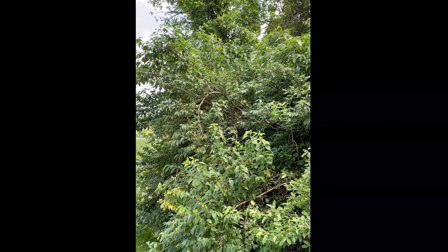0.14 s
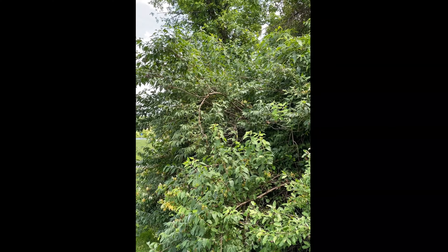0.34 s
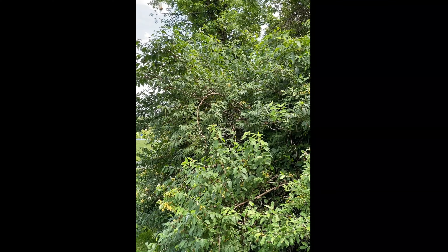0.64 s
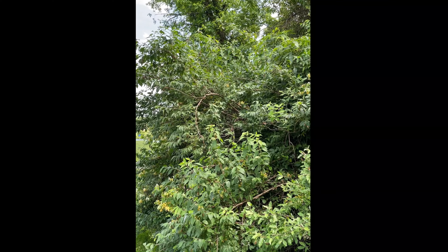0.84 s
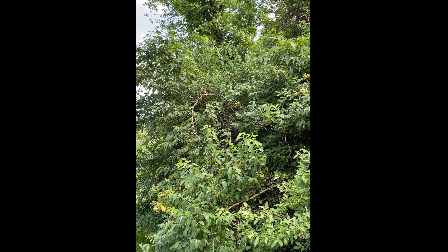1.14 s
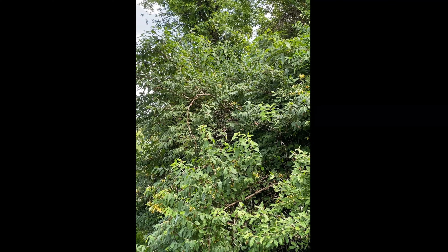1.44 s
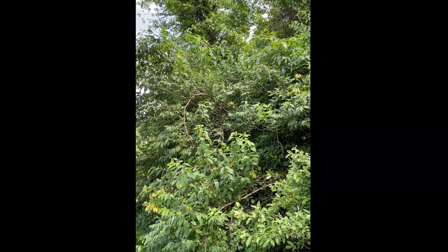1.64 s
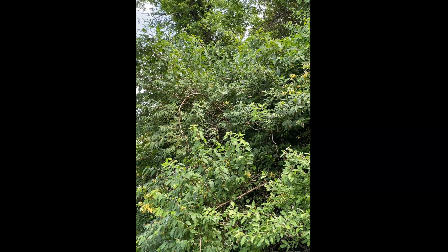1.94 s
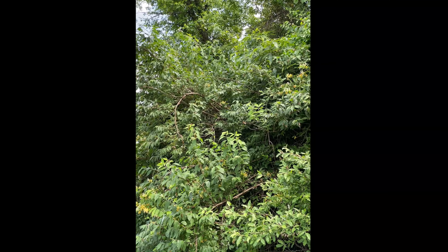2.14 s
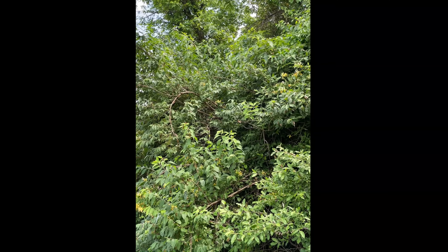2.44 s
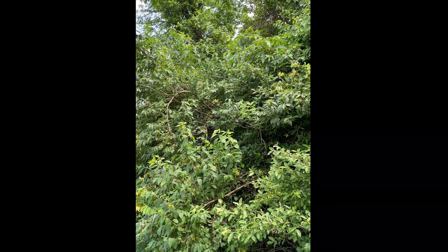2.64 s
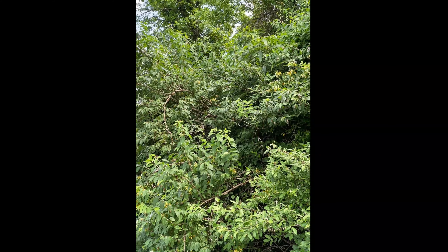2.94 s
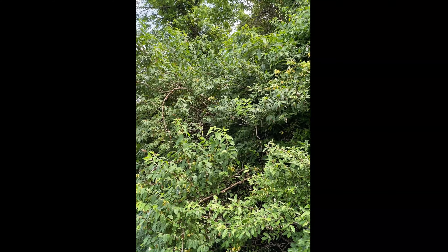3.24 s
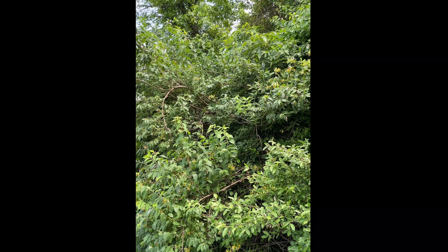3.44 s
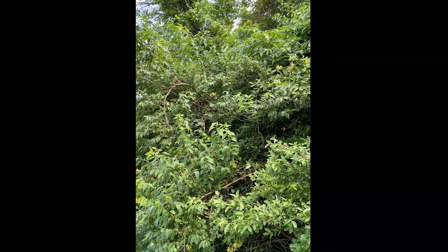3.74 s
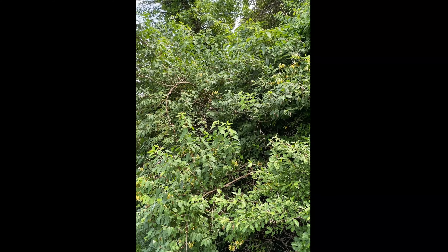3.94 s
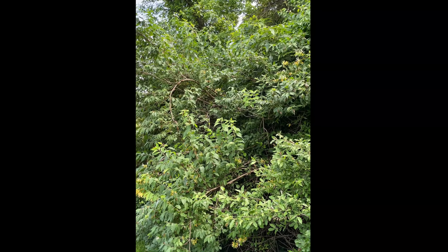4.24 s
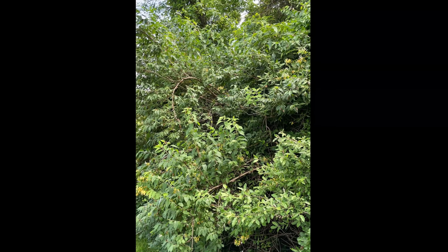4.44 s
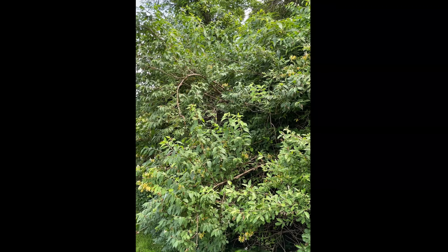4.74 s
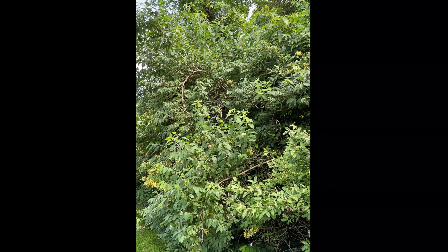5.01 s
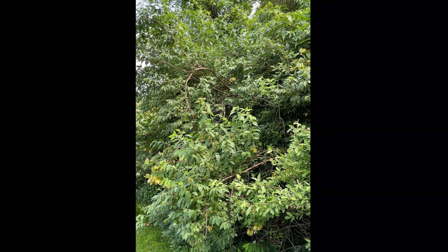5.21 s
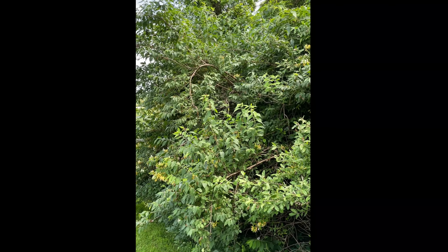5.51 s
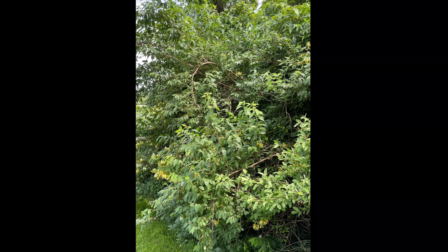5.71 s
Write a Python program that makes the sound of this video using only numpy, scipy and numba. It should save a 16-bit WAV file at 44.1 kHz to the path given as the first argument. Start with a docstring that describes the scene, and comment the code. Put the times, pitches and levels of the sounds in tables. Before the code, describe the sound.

Massed cicadas shimmer in a high, harsh buzz that rises and sinks, with a mellow steady drone of other cicadas farther off.

```python
"""Periodical cicadas that buzz near 5.7 kHz and swell in a shared wave, in the trees at the edge of a lawn,
on the two microphone ports of a hand-held phone. Bursts of noise and clicks ring each abdomen.
Farther off, a second kind holds hollow notes near 1.3 kHz, sine tones that slur down at their ends
and merge into a drone. Filtered noise gives the faint traffic rumble; wavering tones, a far engine's hum."""
import sys
import numpy as np
from scipy import signal
from scipy.fft import rfft, irfft, next_fast_len
from scipy.io import wavfile
from scipy.ndimage import map_coordinates
from numba import njit

SR = 44100
rng = np.random.default_rng(int(sys.argv[2]) if len(sys.argv) > 2 else 0)


def master(y):
    """Save y as 16-bit WAV."""
    cut = np.clip(np.atleast_2d(y).T, -1, 1)
    pcm = np.round(cut * 32767)  # scale
    wavfile.write(sys.argv[1], SR, pcm.astype(np.int16))


N = 258867
TIME = np.arange(N) / SR
SIZE = next_fast_len(N)
FREQS = np.arange(SIZE // 2 + 1) * SR / SIZE

# Shared wave of the buzzers, before each layer's own gain:
# (time [s], level of the ring [dB], level of the rasp [dB])
BUZZ_WAVE = [(0.0, -29.5, -38.5), (0.13, -28, -38.5), (0.33, -28, -40.5), (0.42, -30, -40.5),
             (0.85, -31.5, -43), (1.17, -31, -42.5), (1.43, -29.5, -41), (1.58, -31, -42.5),
             (2.12, -29.5, -42), (2.75, -28, -39.5), (3.3, -26.5, -38), (3.62, -27.5, -37),
             (4.02, -23, -35), (4.5, -22, -33.5), (4.82, -24.2, -35.5), (5.15, -24, -36),
             (5.45, -25.5, -37.5), (5.77, -28.6, -41), (5.87, -29.5, -39.5)]
# Pitch that the buzzers' abdomens ring around: (time [s], resonance [Hz])
ABDOMEN_PITCH = [(0.0, 5790), (1.15, 5650), (1.3, 5570), (1.88, 5626), (4.4, 5700), (5.87, 5730)]
# Rasp of the tymbal ribs around the abdomen's ring: (frequency [Hz], relative level [dB])
RASP_SPECTRUM = [(1800, -39), (2450, -25.5), (3100, -15), (3700, -2.4), (4200, 1.0), (4800, .3), (5200, 2),
                 (6900, -1.2), (7900, -3.2), (8700, -8), (9300, -18), (10400, -21), (11400, -15.3),
                 (12500, -16.8), (14000, -17.3), (15000, -22), (15700, -33)]
# Buzzers deep in the woods, dulled by distance: (frequency [Hz], relative level [dB])
FAR_BUZZ_SPECTRUM = [(1900, -31), (2350, -21), (2600, -15.5), (3100, -5.5), (3700, 2.5), (4300, 4.5),
                     (5500, -0.5), (8000, -48)]
# Blended voices of the farthest droners: (frequency [Hz], relative level [dB])
MURMUR_SPECTRUM = [(600, -42), (750, -22), (860, -12.5), (1030, -14), (1110, -6), (1190, 1), (1335, 3.5),
                   (1490, -5), (1580, -15), (1730, -21), (1860, -32.5), (2400, -41)]
# Nearer groups slurring down at the end of a note: (nominal time at the bottom [s],
# lowest pitch at the group's middle [Hz], relative level [dB], length of the slur [s])
SLUR_GROUPS = [(.75, 835, -67, 0.28), (1.48, 880, -63.5, .45), (1.88, 855, -60.5, .36),
               (3.449, 840, -63.5, .33), (4.5, 850, -59.5, 0.61), (5.4, 950, -64, 0.21),
               (5.699, 845, -63, 0.37)]
# Open air and traffic: (frequency [Hz], relative level [dB])
AIR_SPECTRUM = [(20, -15), (32, -21), (45, -6), (70, 0), (100, -5.5), (125, -8), (160, -11.5), (230, -17),
                (420, -17), (640, -19), (1800, -21), (4000, -29)]
# Hum of a far engine: (frequency [Hz], relative level [dB])
ENGINE_HUM = [(70, -11), (122, -10.5)]
# Course of the background, air and hum together: (time [s], relative level [dB])
RUMBLE_LEVEL = [(0, -60), (0.7, -59.5), (0.92, -58), (1.15, -59), (1.3, -56), (2.9, -55.5), (3.6, -54.5),
                (4.4, -56.5), (5.3, -59), (5.87, -57)]
# Short surges of the rumble: (time [s], level [dB])
RUMBLE_SURGES = [(1.3, -54), (5.08, -53), (5.6, -60)]
# The two microphone ports: (frequency [Hz], likeness [-1 to 1], lead of the left [rad])
MIC_PORTS = [(70, .998, 0), (140, .93, 0), (300, .25, 0), (620, -.28, 0), (1350, -.25, 0), (1800, .7, 0),
             (2600, .25, 0), (4200, .4, -.1), (4650, .25, -1.5), (5000, .52, -2), (5300, .3, -.6),
             (5700, .63, .45), (6500, .87, 1.15), (8500, .83, 2.4), (10000, .96, 3.14), (12500, .62, 4.7),
             (15000, .6, 6.4)]

# The drone makes one slow swell: it rises, holds and falls away
DRONE_DB, DRONE_CREST_S, DRONE_HOLD_S = -42.5, 2.75, 1.47
DRONE_RISE_DB_PER_S, DRONE_FALL_DB_PER_S = 1.58, 3
TOP_HZ = 15400  # upper limit of the phone


def undb(db):
    """Decibels to gain."""
    return 10 ** (np.asarray(db) / 20)


def unit(x):
    """Scale to rms 1."""
    return x / np.sqrt(np.mean(x ** 2))


def curves(table):
    """The columns of a timed table, sample by sample."""
    s, *columns = np.transpose(table)
    return [np.interp(TIME, s, column) for column in columns]


def spectra(table):
    """The columns of a frequency table, joined on a log axis."""
    hz, *columns = np.transpose(table)
    return [np.interp(np.log(FREQS + 1), np.log(hz), column) for column in columns]


def colour(x, table):
    """Filter by (frequency [Hz], level [dB]) points; rms 1."""
    gain = undb(spectra(table)[0])
    return unit(irfft(rfft(x, SIZE) * gain, SIZE)[..., :N])


def walk(rate, t=TIME):
    """Random values, `rate` of them a second, joined by straight lines."""
    points = rng.standard_normal(4096)
    return np.interp(t * rate + rng.random(), np.arange(len(points)), points)


@njit
def resonate(x, hz, width):
    """State-variable band-pass with a moving centre, like a resonant cavity whose pitch shifts."""
    y, band, low = np.empty(len(x)), 0., 0.
    for i in range(len(x)):
        g = np.tan(np.pi * hz[i] / SR)
        damping = width / hz[i]
        v = (band + g * (x[i] - low)) / (1 + g * (g + damping))
        band = 2 * v - band
        low = low + 2 * g * v
        y[i] = damping * v
    return y


def ports(pair):
    """Share two unrelated halves of the sound field between the left and right microphone ports."""
    likeness, lead = spectra(MIC_PORTS)
    likeness = np.clip(likeness, -1, 1)
    shares = np.sqrt([(1 + likeness) / 2, (1 - likeness) / 2])
    common, apart = rfft(pair, SIZE) * shares
    turn = np.exp(1j * lead / 2)
    left, right = (common + apart) * turn, (common - apart) / turn
    return irfft(np.array([left, right]), SIZE)[:, :N]


def pan(pair, left_db):
    """Lean a sound to the left by some dB; negative leans right."""
    return pair * undb([[left_db / 2], [-left_db / 2]])


def shimmer(pair, size=2048):
    """Narrow strands of the sound flare and fade, each on its own."""
    depth_db, strand_hz, strand_s = 1.85, 45, .05
    overlap = size * 3 // 4
    hz, s, bands = signal.stft(pair, SR, nperseg=size, noverlap=overlap)
    chance = rng.standard_normal((512, 512))
    places = np.meshgrid(hz / strand_hz, s / strand_s, indexing="ij")
    flare = map_coordinates(chance, places, order=2, mode="mirror")
    flared = bands * undb(depth_db * flare)
    return signal.istft(flared, SR, nperseg=size, noverlap=overlap)[1][:, :N]


def tymbal(rate_hz, waver=.025, burst=0.16, scatter=0.88, throb_db=1.8, throb_hz=11):
    """One insect's ribs buckle in a burst each cycle as its abdomen throbs; leaves scatter sound into the gaps."""
    # burst is a fraction of the cycle
    phase = (np.cumsum(rate_hz * (1 + waver * walk(9))) / SR + rng.random()) % 1
    bursts = (np.exp(-phase / burst) + scatter) * rng.standard_normal(N)
    own_throb_hz = throb_hz * 2 ** rng.uniform(-.5, 0.46)
    throb = np.sin(2 * np.pi * (TIME * own_throb_hz + rng.random()))
    return bursts * undb(throb_db * throb)


def buzzers(ring_hz, count=22, rate_hz=190):
    """A tree of buzzers, as (ring, rasp): each tymbal has its own pace and rings an abdomen of its own size."""
    ring, rasp = 0, 0
    width_hz, spread = 1040., .069  # width of each resonator stage; scatter of pitch as a fraction
    # most abdomens are near the common size, a few larger or smaller
    for detune in spread * np.arctanh(np.linspace(-1, 1, count + 2)[1:-1]):
        clicks = tymbal(rate_hz * 2 ** rng.uniform(-1, 1))
        hz = ring_hz * (1 + detune)
        ring = ring + resonate(resonate(clicks, hz, width_hz), hz, width_hz)
        rasp = rasp + clicks
    return unit(ring), colour(rasp, RASP_SPECTRUM)


def near_buzzers(ring_hz, count=6, rate_hz=290, waver=.012, spread=0.074, width_hz=1000.0, click_db=1.5):
    """Close insects whose rib clicks stay distinct and ring the abdomen in a pitched buzz."""
    out = 0
    for detune in spread * np.linspace(-1, 1, count):
        own_rate_hz = rate_hz * 2 ** rng.uniform(-.5, .5)
        turns = np.cumsum(own_rate_hz * (1 + waver * walk(14))) / SR
        # one click each time a cycle is completed
        clicks = np.diff(np.floor(turns), prepend=0) * undb(click_db * walk(200))
        hz = ring_hz * (1 + detune)
        out = out + unit(resonate(resonate(clicks, hz, width_hz), hz, width_hz))
    return unit(out)


def chorus(ring_db=-0.9, near_db=-6.5, rasp_db=8.3):
    """Two trees of buzzers swell and sink together, a few close insects standing out of each."""
    ring_wave_db, rasp_wave_db = curves(BUZZ_WAVE)
    ring_hz, = curves(ABDOMEN_PITCH)
    trees = []
    for _ in range(2):
        ring, rasp = buzzers(ring_hz)
        ring = undb(ring_db) * ring + undb(near_db) * near_buzzers(ring_hz)
        trees.append(ring * undb(ring_wave_db) + rasp * undb(rasp_wave_db + rasp_db))
    return shimmer(np.array(trees))


def far_buzzers(level_db=-45.0, sway_db=3.2):
    """Countless distant buzzers stay out of the wave: a dull rasp beneath it whose level sways at random."""
    rasp = colour(rng.standard_normal((2, N)), FAR_BUZZ_SPECTRUM)
    return ports(shimmer(rasp)) * undb(level_db + sway_db * walk(6))


def droners(count=16, pitch_hz=1320, spread_hz=45, waver_hz=8, call_s=3.5,
            slur_s=0.39, slur_hz=480, fade_db=1.0, size=8):
    """Near-pure voices, each holding a note and then slurring down as it fades."""
    t = np.arange(N // size + 1) * size / SR  # every size-th sample, resampled at the end
    voices = 0
    for rank in np.linspace(-1, 1, count + 2)[1:-1]:
        # most sit close to the common pitch, a few stray far from it
        own_hz = pitch_hz - spread_hz * np.sign(rank) * np.log(1 - abs(rank))
        age = (t + call_s * rng.random()) % call_s
        slur = np.clip(1 - (call_s - age) / slur_s, 0, 1)
        hz = own_hz + waver_hz * walk(35, t) - slur_hz * np.sin(np.pi / 2 * slur)
        attack = np.minimum(age / 0.2, 1)
        loudness = attack * (1 - slur) * undb(fade_db * walk(11, t))
        turns = np.cumsum(hz) * size / SR + rng.random()
        voices = voices + loudness * np.sin(2 * np.pi * turns)
    return unit(signal.resample_poly(voices, size, 1)[:N])


def held_note(pitch_hz=1336, drift_hz=9, tremble_hz=17, tremble_db=2.2, fade_db=2):
    """The core of the drone: one held tone whose pitch and level drift and, faster, tremble."""
    hz = pitch_hz + drift_hz * walk(9) + tremble_hz * walk(110)
    tone = np.sin(2 * np.pi * np.cumsum(hz) / SR)
    return unit(tone * undb(tremble_db * walk(60) + fade_db * walk(7)))


def drone(voices_db=-4.5, murmur_db=-3, core_db=-6.5, core_crest_s=3.95, core_fade_db_per_s=1.53):
    """Droners of the nearer woods over the blur of farther ones; their shared note stands out at the height."""
    voices = np.array([droners() for _ in range(2)])
    murmur = colour(rng.standard_normal((2, N)), MURMUR_SPECTRUM)
    woods = ports(undb(voices_db) * voices + undb(murmur_db) * murmur)
    core = pan(held_note(), left_db=2)
    core = core * undb(core_db - core_fade_db_per_s * abs(TIME - core_crest_s))
    before_s = np.maximum(DRONE_CREST_S - TIME, 0)
    after_s = np.maximum(TIME - DRONE_CREST_S - DRONE_HOLD_S, 0)
    swell_db = DRONE_DB - DRONE_RISE_DB_PER_S * before_s - DRONE_FALL_DB_PER_S * after_s
    return (woods + core) * undb(swell_db)


def background(air_db=1, hum_waver=0.0273, hum_fade_db=3):
    """Far traffic rumble and open air, with a weak wavering engine hum alike at both ports."""
    air = ports(colour(rng.standard_normal((2, N)), AIR_SPECTRUM))
    hum = 0
    for hz, db in ENGINE_HUM:
        turns = np.cumsum(hz * (1 + hum_waver * walk(5.0))) / SR
        hum = hum + np.sin(2 * np.pi * turns) * undb(db + hum_fade_db * walk(5.9))
    return (undb(air_db) * air + hum) * undb(curves(RUMBLE_LEVEL)[0])


def slurs(top_hz=1120, release_s=0.11, blur_hz=38, straggle_s=.055, spread_hz=42, count=3):
    """Small groups of droners slide down from their note and stop; echoes among the trees blur the pitch."""
    out = 0
    for group_s, group_hz, db, fall_s in SLUR_GROUPS:
        for rank in np.linspace(-1, 1, count):
            left_s = group_s + straggle_s * rng.standard_normal() - TIME
            low_hz = group_hz + spread_hz * rank
            to_go = np.clip(left_s / fall_s, 0, 1)
            hz = low_hz + (top_hz - low_hz) * to_go ** 2
            phase = 2 * np.pi * np.cumsum(hz) / SR
            attack = np.minimum(2 * (1 - to_go), 1)
            release = np.clip(left_s / release_s + .5, 0, 1)
            # separate random levels on the two channels widen the tone into a narrow band
            voice = np.array([walk(blur_hz), walk(blur_hz)]) * np.sin(phase)
            out = out + undb(db) * attack * release * unit(voice)
    return ports(out / np.sqrt(count))


def surges(centre_hz=72, width_hz=38.0, length_s=0.042):
    """The rumble heaves briefly, alike at both ports: low resonant noise under bell-shaped swells."""
    centre = np.full(N, 1. * centre_hz)
    noise = rng.standard_normal(N)
    low = unit(resonate(resonate(noise, centre, width_hz), centre, width_hz))
    return low * sum(undb(db) * np.exp(-((TIME - s) / length_s) ** 2) for s, db in RUMBLE_SURGES)


def scene():
    """Buzzers ahead and slightly right, the drone a little to the left, the rumble below."""
    buzz = ports(chorus()) + far_buzzers()
    hollow = drone() + slurs()
    return pan(buzz, left_db=-0.47) + pan(hollow, left_db=1.5) + background() + surges()


def record(dry):
    """The phone cuts the top with a steep low-pass."""
    low_pass = signal.ellip(8, .2, 70, TOP_HZ, fs=SR, output="sos")
    return signal.sosfilt(low_pass, dry)


dry = scene()
out = record(dry)
master(out)
```